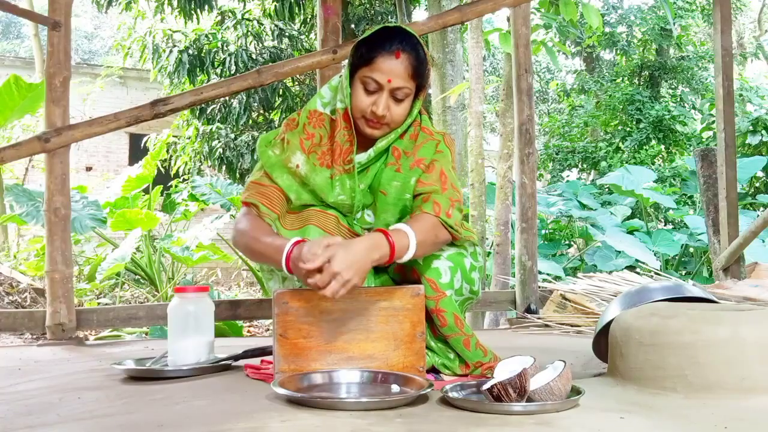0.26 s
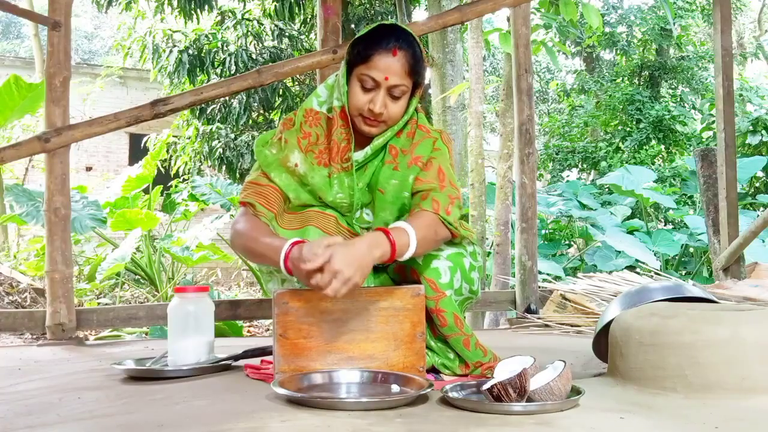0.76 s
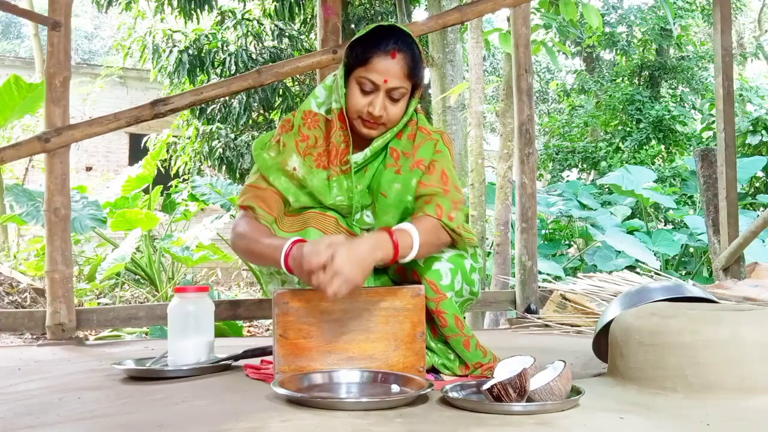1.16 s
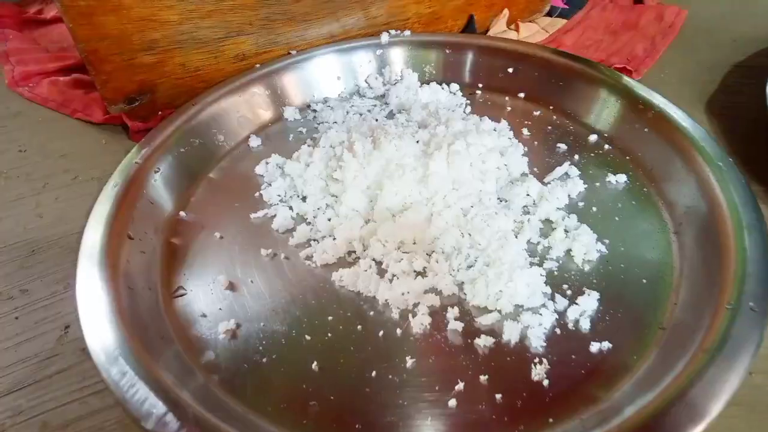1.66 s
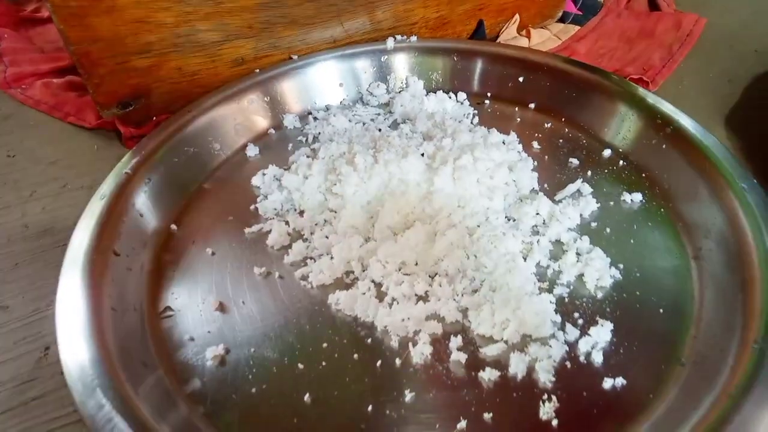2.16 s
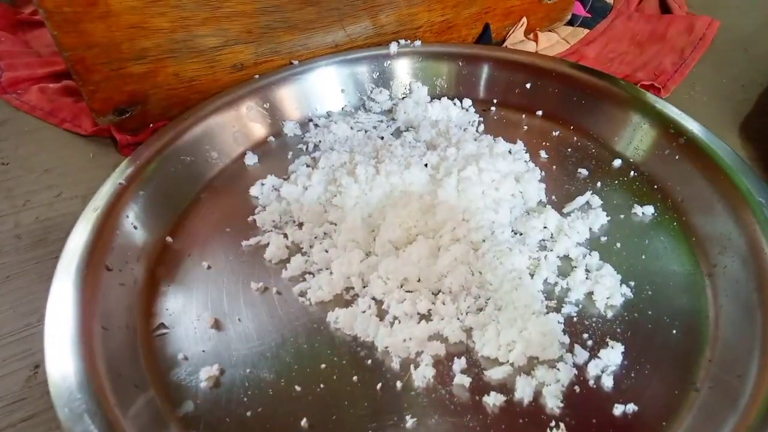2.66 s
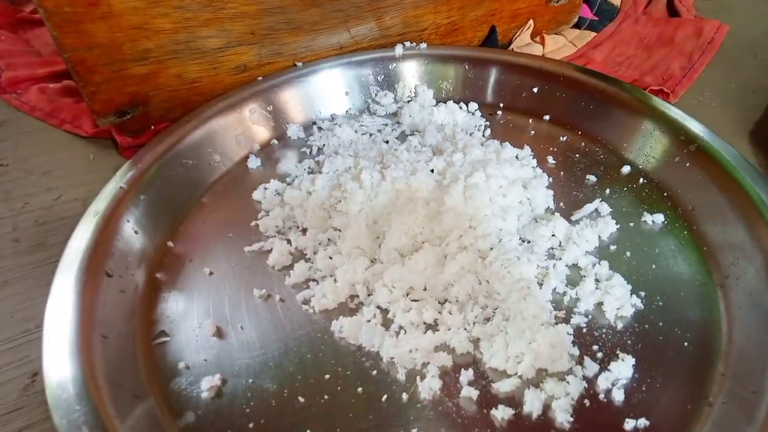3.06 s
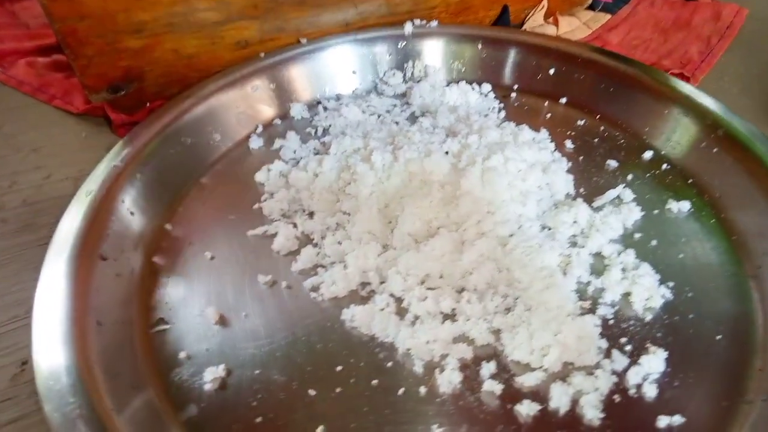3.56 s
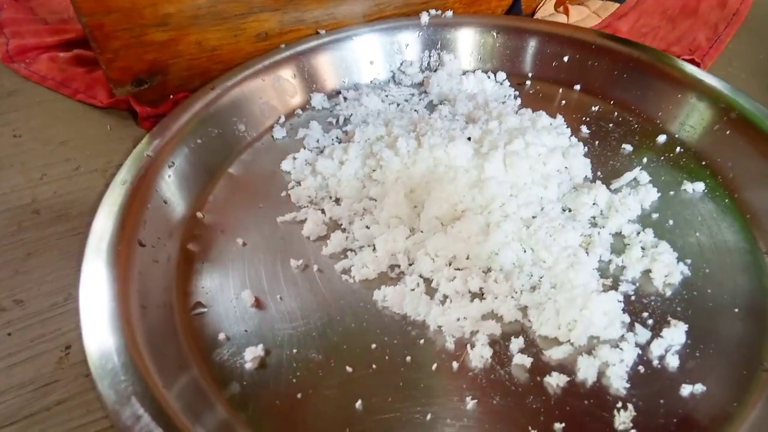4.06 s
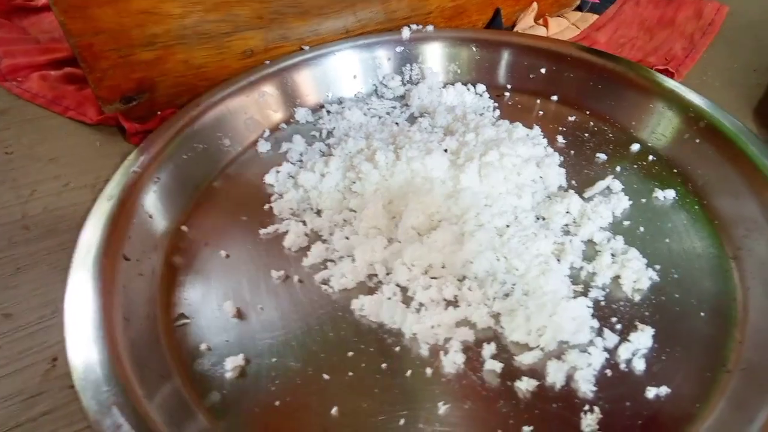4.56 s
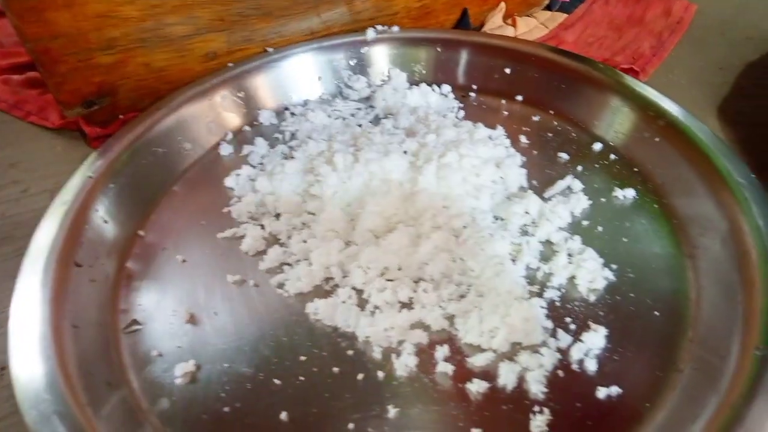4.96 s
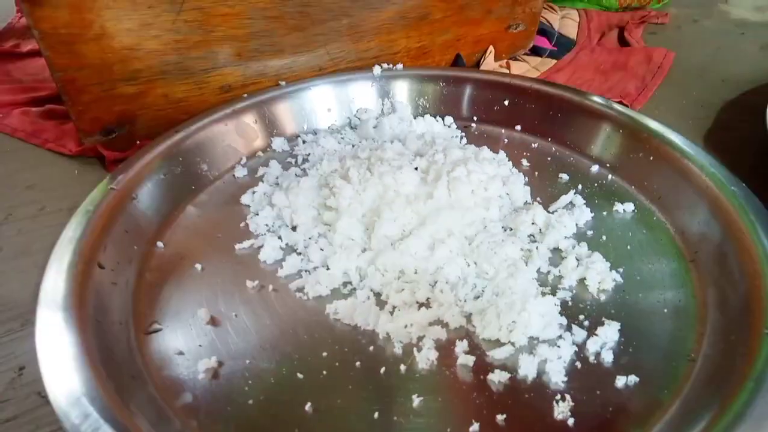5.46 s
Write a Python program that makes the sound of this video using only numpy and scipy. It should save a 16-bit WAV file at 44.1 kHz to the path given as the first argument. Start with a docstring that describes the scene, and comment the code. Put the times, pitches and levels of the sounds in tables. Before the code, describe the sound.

Rough scraping of coconut flesh on metal teeth, about two strokes a second, with hollow shell knocks, ringing steel and garden birdsong.

```python
"""In an open shelter beside a garden, half a coconut is rasped over a serrated steel blade, about two strokes a second.
Random slips of the teeth drive filters for the torn flesh, the ringing blade and the hollow shell; noise bursts
make rips, snaps and knocks. Gliding tones make birds and insects, and coloured noise the murmur of the garden.
The first strokes are heard from across the floor, the later ones from close by; the sound drops out briefly twice."""
import sys
import numpy as np
from scipy import signal
from scipy.fft import rfft, irfft
from scipy.io import wavfile
from scipy.ndimage import uniform_filter1d, map_coordinates

SR = 44100
rng = np.random.default_rng(int(sys.argv[2]) if len(sys.argv) > 2 else 0)


def digitize_waveform(pressure):
    """Quantize a signal to 16-bit integers and store it at the path in sys.argv[1].

    Rows of a 2-D input are taken as channels; values are limited to [-1, 1].
    """
    field = np.atleast_2d(pressure).T
    bounded = np.clip(field, -1, 1)
    quanta = np.round(bounded * 32767).astype(np.int16)
    wavfile.write(sys.argv[1], SR, quanta)


N = 251137
TIME = np.arange(N) / SR  # s
MOVE_S = 1.57  # s, heard from afar before, from close by after

# Spectra of the garden murmur, afar and near. Each row: frequency in Hz, relative density in dB per Hz.
GARDEN_FAR = [(30, -8), (90, -5.5), (170, 4.5), (300, -5), (480, -21), (700, -15.5), (1250, -19.5),
              (1900, -16.5), (3500, -23.5), (5200, -39), (8000, -34), (11000, -50), (16000, -61)]
GARDEN_NEAR = [(30, -14), (90, -2.5), (165, 2.5), (320, -10.5), (500, -11.5), (850, -15.5), (1300, -13.5),
               (2200, -14.5), (3600, -13.5), (4600, -22), (6600, -20.5), (7600, -29), (10000, -34),
               (16000, -40)]
# Bird calls. Each row: start in s, length in s, first pitch in Hz, last pitch in Hz, relative level in dB,
# random pitch flutter (harshness) in Hz.
BIRD_CALLS = [(0.0, 0.06, 4570, 4620, -58.5, 90), (0.0, 0.16, 2324, 1790, -47.5, 346),
              (0.355, 0.168, 4770, 4660, -51.5, 109), (0.556, .09, 4070, 3900, -55.5, 89),
              (0.849, 0.093, 3870, 3505, -51.5, 256), (1.244, 0.18, 4910, 4670, -53.5, 159),
              (1.274, 0.062, 1744, 1420, -47, 88), (2.078, 0.085, 3430, 3280, -38, 77.6),
              (3.114, 0.07, 3550, 3380, -46, 150), (3.409, 0.12, 2900, 3100, -36.5, 188.5),
              (3.427, 0.15, 3600, 3610, -41, 237), (4.504, .1, 3490, 3720, -41.5, 109),
              (4.557, 0.086, 3090, 2096, -43, 180), (4.651, 0.15, 3645, 3334, -45, 111.5),
              (4.689, .18, 3017, 3060, -41.5, 243.4), (4.759, .11, 5740, 5250, -49.5, 690),
              (4.942, 0.027, 3460, 3195, -33.5, 43.7), (5.082, 0.12, 3580, 3810, -37, 116.5),
              (5.371, 0.046, 2965, 3480, -38.5, 108), (5.378, 0.043, 4740, 4770, -46.5, 202)]
# Decay of the echo among trees and under the shelter. Each row: frequency in Hz, time to fall 60 dB in s.
TREE_DECAY = [(1000, 0.7), (6000, 0.36)]
SHELTER_DECAY = [(150, 0.24), (700, 0.13), (3000, 0.25), (8000, 0.1), (15000, 0.17)]
# Reflections from the floor, the board and the steel plate. Each row: delay in s, level in dB.
REFLECTIONS = [(.0011, -21.5), (.0019, -11.5), (.0033, -16), (.0052, -18.5), (.0086, -15)]
# Blows of the shell on the blade and its board. Each row: time in s, peak level in dB, pitch in Hz.
KNOCKS = [(0.159, -4.5, 701), (0.986, -21, 693), (1.017, -32, 620), (1.051, -19.5, 706),
          (1.495, -28.5, 325), (1.52, -29, 693), (1.718, -16.5, 193), (2.105, -37, 706), (2.223, -15, 260),
          (2.37, -33, 700), (2.579, -27, 147), (2.765, -15, 690), (2.769, -11, 198), (2.865, -18, 189),
          (3.218, -9.5, 673), (3.386, -35, 180), (3.639, -33.5, 161), (3.752, -13, 200),
          (3.923, -19.5, 654), (4.175, -35, 157), (4.291, -17, 159), (4.944, -15, 682), (4.968, -22, 567),
          (5.028, -20, 680), (5.069, -19, 640), (5.116, -16, 686), (5.235, -40, 557), (5.627, -20, 666),
          (5.66, -23.5, 678)]
# Modes of the shell from afar, close by and lightly pressed, and of the blade.
# Each row: frequency in Hz, bandwidth in Hz, relative level in dB.
SHELL_FAR = [(167, 52, -7.5), (293, 33.5, 3.5), (461, 115, -9), (636, 163, -11), (710.6, 29, 3.5),
             (1085, 130, -6), (1230, 96, -11.5)]
SHELL_NEAR = [(177.8, 32.5, 2.5), (281, 75, -3), (343, 93, -3), (483, 95, -1), (547, 202, -4),
              (715, 58.5, -0.5), (1043, 45, -11.5), (1197, 170, -13)]
SHELL_LIGHT = [(173, 23, -1.5), (310, 82, -1.5), (462, 122, 2), (602, 84, 5), (725, 29, 3.5),
               (1080, 120, -51)]
BLADE = [(1618, 75, -8.5), (2139, 69, 1.5), (2390, 21, -3.5), (2550, 37, -5.5), (2710, 80, -13),
         (2930, 220, 0.5), (3350, 240, -4), (3890, 140, -3.5), (3940, 120, -3.5), (5100, 95, -40),
         (5640, 260, -11.5), (6100, 140, -26), (9260, 56, -17)]
# Pushes of the shell over the teeth; a stroke is a main push and often a lighter follow-through.
# Each row: full pressure at s, attack in s per 20 dB, hold in s, release in s per 20 dB,
# relative shell level in dB, relative rasp level in dB.
PUSHES = [(0.178, .02, 0.0094, 0.056, -18, -39.5), (0.306, 0.098, 0.029, 0.049, -19, -35),
          (0.625, .025, .04, .06, -41.5, -49), (0.691, 0.05, 0.12, 0.052, -24.5, -39.5),
          (1.094, 0.02, 0.013, 0.07, -23.5, -39.5), (1.196, 0.051, 0.059, 0.041, -22, -36.5),
          (1.71, 0.021, .017, .018, -25, -25.5), (1.84, .045, 0.06, 0.024, -28.5, -26),
          (2.211, 0.037, 0.087, 0.059, -26, -24), (2.362, 0.073, 0.066, .05, -38, -36),
          (2.515, 0.018, 0.0086, 0.029, -46, -45.5), (2.575, 0.035, 0.0072, 0.069, -40, -44.5),
          (2.698, 0.019, 0.013, 0.044, -23.5, -31.5), (2.721, 0.03, 0.061, 0.11, -19, -16.5),
          (2.809, 0.05, 0.057, 0.054, -22, -24), (3.221, 0.046, 0.039, 0.2, -21.5, -18.5),
          (3.35, 0.029, 0.035, 0.052, -21, -24), (3.722, 0.016, 0.04, 0.027, -20, -19.5),
          (3.786, 0.012, 0.092, 0.027, -18, -16.5), (3.927, 0.069, 0.0045, 0.042, -25.5, -28),
          (4.038, 0.023, 0.024, 0.049, -47, -43), (4.267, 0.021, 0.019, 0.032, -19, -17.5),
          (4.313, 0.017, 0.11, 0.09, -23.5, -23.5), (4.499, .03, 0.0055, 0.026, -48, -34),
          (5.618, 0.067, 0.046, 0.052, -29, -27)]
# Light pushes in which the shell only chatters on the teeth. Each row: the same columns, in s and dB.
SKIPS = [(4.948, 0.0075, 0.031, 0.054, -19.5, -42), (5.022, 0.028, 0.013, 0.016, -22, -37.5),
         (5.074, 0.016, 0.043, 0.045, -21.5, -37.5), (5.152, 0.028, 0.0072, 0.041, -29.5, -45.5)]
# Spectra of tearing flesh from afar, close by and under a light push, of the smooth slide from afar and of
# the crumbs' fizz. Each row: frequency in Hz, relative density in dB per Hz.
TEARING_FAR = [(300, -4.5), (1200, -3.5), (2000, 4), (3400, -2.5), (4600, -13), (6500, -10.5), (8000, -10),
               (9700, -20), (10500, -23.5), (13500, -22), (16000, -24.5)]
TEARING_NEAR = [(60, -54.5), (200, -20), (600, -5), (1400, -5.5), (2400, 0.5), (3500, 5), (4400, -2),
                (6000, -3), (8000, -14), (10500, -21), (13500, -12), (16000, -16.5)]
TEARING_LIGHT = [(300, -14), (1500, -1.5), (2500, -2), (4000, 1), (4500, -7.5), (6300, -3.5), (7600, -16),
                 (9500, -15.5), (12000, -18), (16000, -21)]
SLIDE_FAR = [(2000, -35.5), (5000, -17), (7500, -2), (8600, -7), (9300, 3), (10200, -19), (13000, -11.5),
             (14500, -9.5), (15300, -0.5), (16000, -6.5)]
FIZZ = [(1000, -40.5), (4500, -11), (6500, -4), (8500, -1), (10500, -7), (12500, 5.5), (14500, -4.5),
        (16000, -4.5)]
# Breaks of the thickest fibres of the flesh. Each row: time in s, relative level in dB.
SNAPS = [(1.637, -24), (1.713, -23), (1.887, -12.5), (1.897, -9), (1.901, -10.5), (2.099, -39),
         (2.2494, -2.5), (2.724, -4.5), (2.736, -14), (2.807, -13.5), (3.2688, -7.5), (3.641, -45),
         (3.752, -4), (3.8382, -8), (3.872, -12), (3.8815, -11.5), (3.952, -25), (4.246, -30), (4.284, -21),
         (4.316, -12), (4.338, -3.5), (4.364, -20), (4.3747, -6.5), (4.426, -23.5)]
# Teeth that catch and let go. Each row: time of release in s, relative level in dB, ring in Hz.
CATCHES = [(1.677, -18, 2310), (1.706, -12.5, 2255), (1.8547, -11, 2144), (2.088, -27.5, 2050),
           (2.221, -4.5, 2220), (2.260, -14.5, 2190), (2.692, -17.5, 2200), (2.731, -4.5, 2214),
           (2.761, -1.5, 2265), (2.8169, -12, 2300), (3.227, -4.5, 2190), (3.249, -6, 2296),
           (3.719, -19, 2165), (3.748, -8.5, 2420), (3.788, -5, 2230), (3.811, -7.5, 2174),
           (3.8355, -5.5, 2480), (3.8711, -3, 2510), (4.265, -15, 2180), (4.281, -12, 2290),
           (4.3186, -11.5, 2050), (4.379, -12.5, 2530), (4.426, -13.5, 2720), (5.6254, -16, 2280),
           (5.6495, -23, 2320)]
# Whines of insects. Each row: start in s, mean pitch in Hz, mean level in dB.
INSECTS = [(2.9, 9230, -72), (4.5, 10200, -75)]
# Dropouts. Each row: almost silent from s, fading in from s, full again at s.
DROPOUTS = [(1.545, 1.589, 1.71), (5.428, 5.452, 5.60)]


def amp(db):
    """Level as a logarithm of amplitude: decibels to gain."""
    return 10 ** (np.asarray(db) / 20)


def along(points, hz):
    """Interpolation of (Hz, value) points on a logarithmic frequency axis."""
    f, v = np.transpose(points)
    return np.interp(np.log(hz + 1), np.log(f + 1), v)


def wobble(rate):
    """Band-limited random fluctuation: a smooth curve through rate random knots a second."""
    knots = rng.standard_normal(int(N * rate / SR) + 4)
    return map_coordinates(knots, [TIME * rate])


def through(x, response):
    """Linear filtering: x convolved with an impulse response."""
    return signal.fftconvolve(x, response)[:N]


def add(track, s, sound):
    """Superposition: mix a sound into the track at time s."""
    room = track[max(round(s * SR), 0):][:len(sound)]
    room += sound[:len(room)]


def colour(spectrum, size=2048):
    """Minimum-phase filtering: the causal response of energy 1 with this spectrum, by way of its cepstrum."""
    log_gain = np.log(amp(along(spectrum, np.fft.rfftfreq(size, 1 / SR))))
    cepstrum = irfft(log_gain)
    response = irfft(np.exp(rfft(2 * cepstrum[:size // 2], size)))
    return response / np.linalg.norm(response)


def body(modes, size=4096):
    """Modal superposition: impulse response of energy 1 of damped modes."""
    t = np.arange(size) / SR
    response = np.zeros(size)
    for k, (hz, width, db) in enumerate(modes):
        decay = np.exp(-np.pi * width * t)
        # neighbouring modes move in opposite senses
        response += (-1) ** k * amp(db) * width * decay * np.cos(2 * np.pi * hz * t)
    return response / np.linalg.norm(response)


def varied(modes, level_db=3, detune=0.019):
    """Modal excitation: the modes as another grip and contact point excite them."""
    chance = rng.standard_normal((len(modes), 2))
    return [(hz * (1 + detune * a), width, db + level_db * b)
            for (hz, width, db), (a, b) in zip(modes, chance)]


def echo(x, decay):
    """Diffuse reverberation: a noise tail in which each frequency dies at its own speed."""
    hz, t, z = signal.stft(rng.standard_normal(SR // 2), SR, nperseg=256)
    fading = z * amp(-60 * t / along(decay, hz)[:, None])
    tail = signal.istft(fading, SR, nperseg=256)[1]
    delayed = np.pad(tail / np.linalg.norm(tail), (SR // 200, 0))  # by 5 ms
    return through(x, delayed)


def garden(far_db=-42, near_db=-50):
    """Broadband ambience: coloured noise for the murmur of leaves and a low, wavering drone."""
    far_level = amp(far_db + wobble(11.27))
    far = far_level * through(rng.standard_normal(N), colour(GARDEN_FAR))
    near_level = amp(near_db + 1.3 * wobble(8.18))
    near = near_level * through(rng.standard_normal(N), colour(GARDEN_NEAR))
    return np.where(TIME < MOVE_S, far, near)


def birds(flutter_rate=600, direct_db=-3, echo_db=-3):
    """Frequency modulation: gliding whistles, harsh where the pitch flutters, blurred by the trees."""
    song = np.zeros(N)
    for s, length, first_hz, last_hz, db, harsh_hz in BIRD_CALLS:
        u = np.clip((TIME - s) / length, 0, 1)  # progress of the call
        hz = first_hz + (last_hz - first_hz) * u + harsh_hz * wobble(flutter_rate)
        swell = np.sqrt(8 * u * (1 - u))
        song += amp(db) * swell * np.sin(2 * np.pi * np.cumsum(hz) / SR)
    return amp(direct_db) * song + amp(echo_db) * echo(song, TREE_DECAY)


def bounced(x, lowest_hz=2500):
    """Specular reflection: small hard surfaces nearby mirror mainly the treble."""
    treble = signal.lfilter(*signal.butter(1, lowest_hz, "high", fs=SR), x)
    out = x.copy()
    for delay, db in REFLECTIONS:
        add(out, delay, amp(db) * treble)
    return out


def knocks(t60=0.075, attack=0.001, wood_db=-3, contact_t60=0.1, contact_db=-14):
    """Impact excitation: a blow thumps at a pitch set by the hardness of the contact and rings the shell."""
    out, t = np.zeros(N), np.arange(SR // 8) / SR
    for s, db, hz in KNOCKS:
        hardness = colour([(hz / 4, -15), (hz, 0), (hz * 1.4, 0), (hz * 2.37, -8),
                           (hz * 4, -22), (hz * 10, -40), (hz * 20, -60)])
        thump = np.sin(2 * np.pi * hz * t) * amp(-60 * t / t60) * (1 - np.exp(-t / attack))
        shell = body(SHELL_FAR if s < MOVE_S else SHELL_NEAR)
        wood = signal.fftconvolve(shell, hardness)[:len(t)]
        # the rough husk grates for an instant as it lands
        rubbing = rng.standard_normal(len(t)) * amp(-60 * t / contact_t60)
        grate = signal.fftconvolve(rubbing, hardness)[:len(t)]
        blow = thump / np.abs(thump).max() + amp(wood_db) * wood / np.abs(wood).max() + amp(contact_db) * grate
        add(out, s, amp(db) * blow / np.abs(blow).max())
    return out


def pressure(pushes, sag_db_per_s, ease_db=20):
    """Contact force, as gains of shell and rasp: the hands lean in, slacken during the hold, and ease off."""
    gains = np.zeros((2, N))
    for s, attack, hold, release, shell_db, rasp_db in pushes:
        t = TIME - s
        ease = np.maximum(-t, 0) / attack + np.maximum(t - hold, 0) / release
        sag_db = sag_db_per_s * (np.clip(t, 0, hold) - hold / 2)
        shape_db = -ease_db * ease - sag_db
        gains = np.maximum(gains, amp([shell_db + shape_db, rasp_db + shape_db]))
    return gains


def teeth(rate, spread_db, judder_rate, judder_db):
    """Stick-slip friction: tiny slips, bunched as the shell judders in the hands, levelled to rms 1."""
    happens = rng.random(N) < rate / SR  # rate: slips a second
    strength = amp(spread_db * np.clip(rng.standard_normal(N), -2, 2))
    slips = happens * rng.choice([-1, 1], N) * strength
    force = slips * amp(judder_db * np.tanh(wobble(judder_rate)))
    power = np.abs(uniform_filter1d(force ** 2, SR // 30))
    return force / np.sqrt(power + 1e-9)


def far_strokes(slide_db=-51, slide_grows=.6, firm_db=-38):
    """Forced resonance from afar: the hollow shell outweighs a dull rasp; sliding hisses even at a light touch."""
    pushes = [push for push in PUSHES if push[0] < MOVE_S]
    shell, rasp = pressure(pushes, sag_db_per_s=6.5)
    force = teeth(rate=3000, spread_db=5.5, judder_rate=150, judder_db=3)
    # the hiss grows more slowly than the rasp; firm_db is the rasp of a firm push
    slide = amp(slide_db) * (rasp / amp(firm_db)) ** slide_grows * rng.standard_normal(N)
    cutting = amp(2.5) * through(force * rasp, colour(TEARING_FAR)) + through(slide, colour(SLIDE_FAR))
    return amp(-4) * through(force * shell, body(SHELL_FAR)) + cutting


def snaps(snap_hz=12950, scatter=.06, t60=.004, tail_t60=0.025, tail_db=-21, level_db=6, skirt_db=-13):
    """Brittle fracture: a breaking fibre gives a sharp, bright tick, its pitch scattered from fibre to fibre."""
    out, t = np.zeros(N), np.arange(SR // 30) / SR
    for s, db in SNAPS:
        hz = snap_hz * np.exp(scatter * rng.standard_normal())
        decay = amp(-60 * t / t60) + amp(tail_db - 60 * t / tail_t60)
        crack = rng.standard_normal(len(t)) * decay
        # the spectrum steps up by 9 dB at the pitch
        bright = colour([(hz / 10, -25), (hz / 2, -6), (hz * 1.0, -9), (hz, 0), (hz * 1.73, skirt_db)])
        tick = signal.fftconvolve(crack, bright)
        add(out, s, amp(db + level_db) * tick / np.abs(tick).max())
    return out


def catches(bright_db=-7, overtones_db=-4, level_db=-7, t60=0.044, attack=.0004, note_width_hz=70):
    """Sudden release: a caught row of teeth lets go in a short rip; where it bites sets the blade's note."""
    out, t = np.zeros(N), np.arange(SR // 15) / SR
    flesh = colour(TEARING_NEAR)
    for s, db, hz in CATCHES:
        rip = rng.standard_normal(len(t)) * amp(-60 * t / t60) * (1 - np.exp(-t / attack))
        note = body([(hz, note_width_hz, 0)])
        overtones = body(varied(BLADE))
        for response, share_db in ((note, 0), (overtones, overtones_db), (flesh, bright_db)):
            sound = signal.fftconvolve(rip, response)
            opening = 2 * np.std(sound[:SR // 100])  # strength of the first 10 ms
            add(out, s, amp(db + level_db + share_db) * sound / opening)
    return out


def sticking(hold_s=0.0085, hush_db=-9):
    """Static friction: caught teeth stand still for a moment before release, hushing shell and rasp."""
    held = np.zeros(N)
    for s, *_ in CATCHES:
        grip = np.clip(2 * (1 - (s - TIME) / hold_s), 0, 1)
        held = np.maximum(held, grip * (TIME < s))
    return amp(hush_db * held)


def near_strokes(fizz_db=-33, fizz_grows=1.1, firm_db=-18):
    """Forced resonance close by: steel rings under tearing flesh; moist crumbs crackle more under a firm push."""
    pushes = [push for push in PUSHES if push[0] > MOVE_S]
    shell, rasp = pressure(pushes, sag_db_per_s=55) * sticking()
    fizz = amp(fizz_db) * (rasp / amp(firm_db)) ** fizz_grows  # firm_db: rasp of a firm push
    force = teeth(rate=2200, spread_db=3.5, judder_rate=180, judder_db=5.5)
    crumbs = teeth(rate=2300, spread_db=6, judder_rate=200, judder_db=5)
    # the contact point wanders along the teeth and shifts the balance of the blade's modes
    place = wobble(25)
    steel = np.zeros(N)
    for share in (np.cos(place), np.sin(place)):
        steel += through(force * rasp * share, body(varied(BLADE)))
    tearing = amp(-7.0) * through(force * rasp, colour(TEARING_NEAR))
    crackle = amp(-5) * through(crumbs * fizz, colour(FIZZ))
    hollow = amp(-3.5) * through(force * shell, body(SHELL_NEAR))
    return hollow + amp(-4.5) * steel + tearing + crackle


def insects(shimmer_hz=35, swell_s=0.2):
    """Near-pure tones: a faint, thin whine of insects that start up in the leaves, shimmering in pitch."""
    whine = np.zeros(N)
    for s, hz, db in INSECTS:
        level = np.clip((TIME - s) / swell_s, 0, 1) * amp(db + 1.1 * wobble(1.6))
        pitch = hz + shimmer_hz * wobble(330)
        whine += level * np.sin(2 * np.pi * np.cumsum(pitch) / SR)
    return whine


def light_stroke():
    """Intermittent contact: the shell skips over the teeth and hardly cuts."""
    shell, rasp = pressure(SKIPS, sag_db_per_s=24)
    force = teeth(rate=1200, spread_db=2.5, judder_rate=130, judder_db=5.5)
    tearing = amp(3.5) * through(force * rasp, colour(TEARING_LIGHT))
    steel = amp(-1) * through(force * rasp, body(BLADE))
    return amp(-3.5) * through(force * shell, body(SHELL_LIGHT)) + tearing + steel


def scene():
    """Superposition of direct sound, reflections and reverberation under the roof, with the garden around."""
    far = bounced(far_strokes())
    near = bounced(near_strokes() + light_stroke() + catches() + snaps() + knocks())
    shelter = echo(amp(-12) * far + amp(-15.5) * near, SHELTER_DECAY)
    return (far + near + shelter + birds() + insects() + garden())[None]


def record(dry, low_cut_hz=85, top_hz=15700, clip_level=.74):
    """Band limiting and clipping: the microphone thins the bass, two dropouts fade back, peaks clip, the top is cut."""
    gain = np.ones(N)
    for off, fade, full in DROPOUTS:
        fade_in = np.clip((TIME - fade) / (full - fade), .01, 1)
        gain *= np.where(TIME < off, 1, fade_in)
    thin = signal.lfilter(*signal.butter(2, low_cut_hz, "high", fs=SR), dry)
    clipped = np.clip(thin * gain, -clip_level, clip_level)
    top = signal.firwin(301, top_hz, window="blackman", fs=SR)
    return signal.fftconvolve(clipped, top[None], mode="same")


dry = scene()
out = record(dry)
digitize_waveform(out)
```